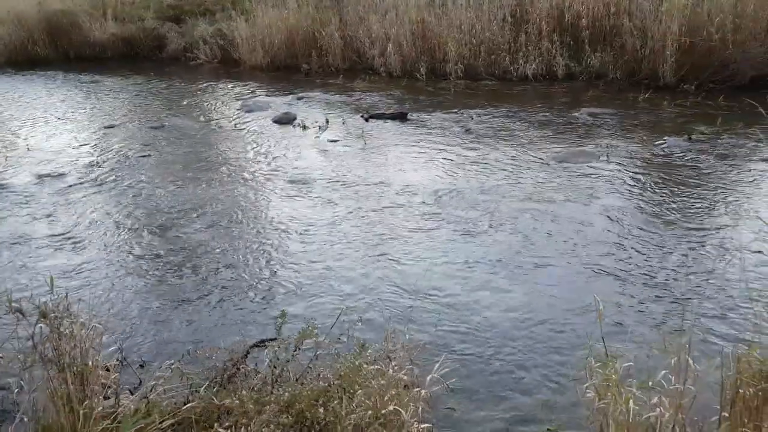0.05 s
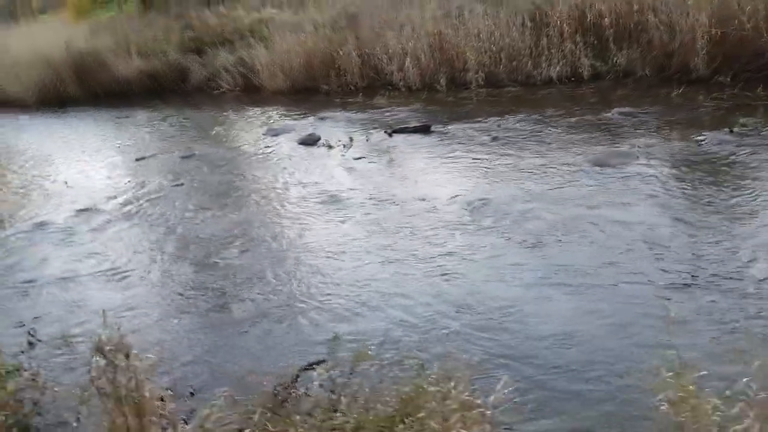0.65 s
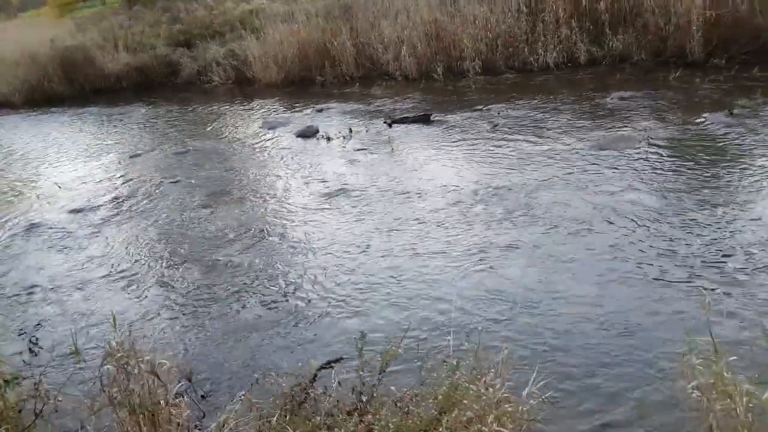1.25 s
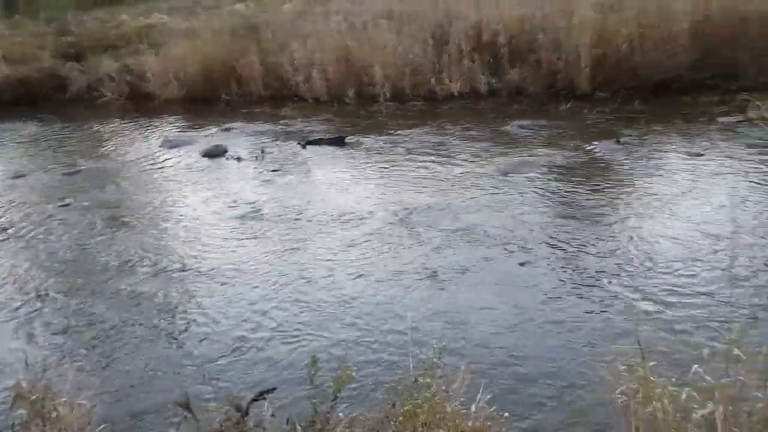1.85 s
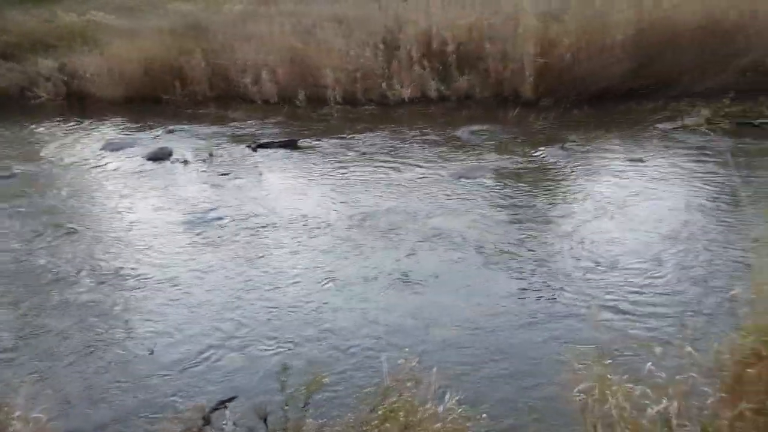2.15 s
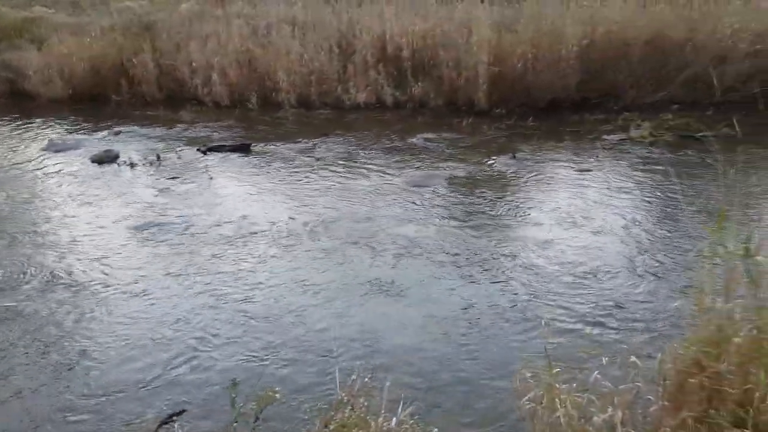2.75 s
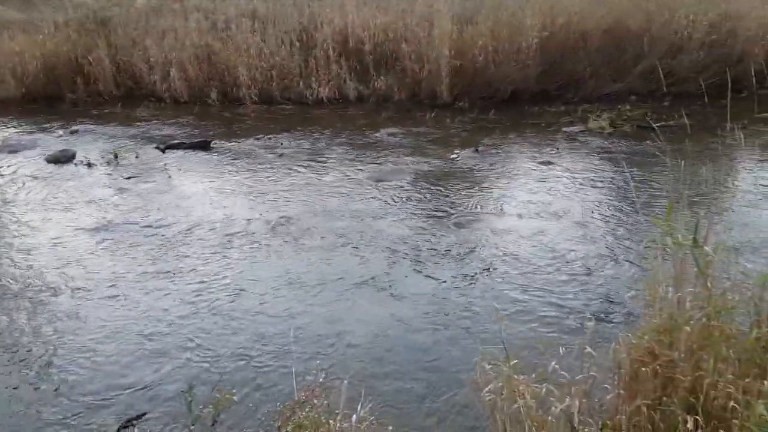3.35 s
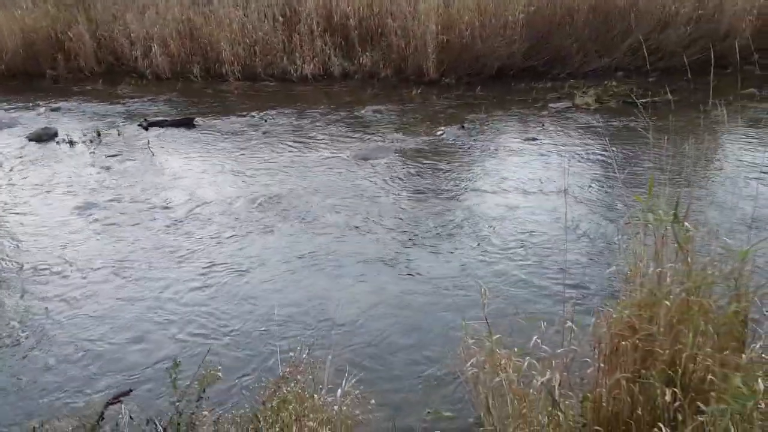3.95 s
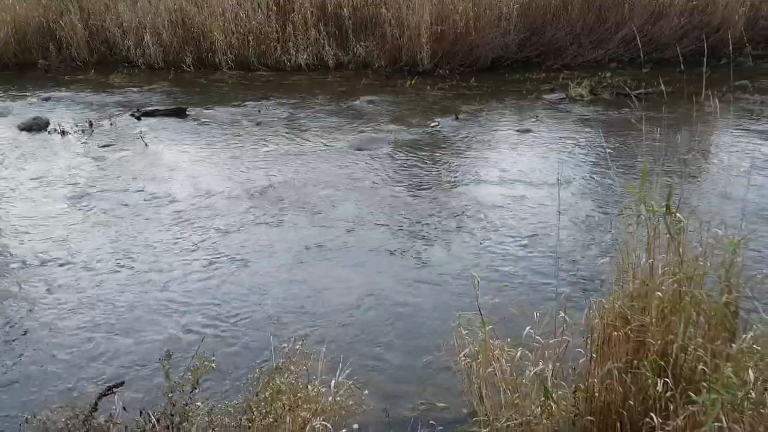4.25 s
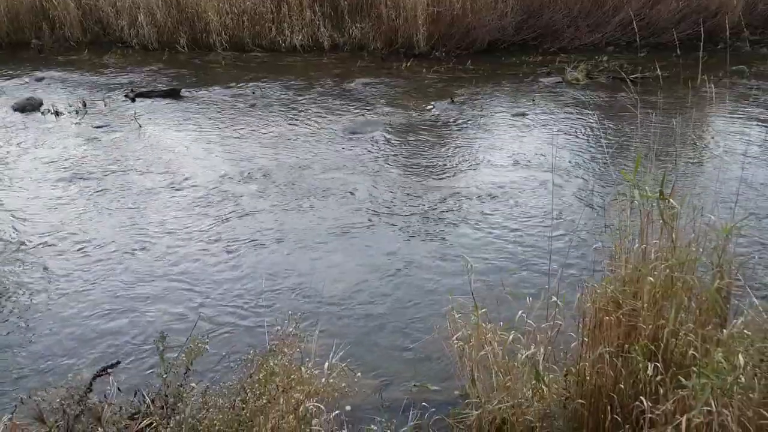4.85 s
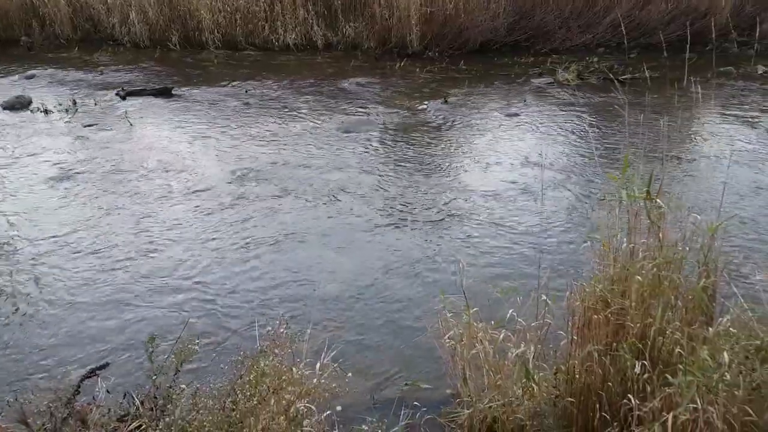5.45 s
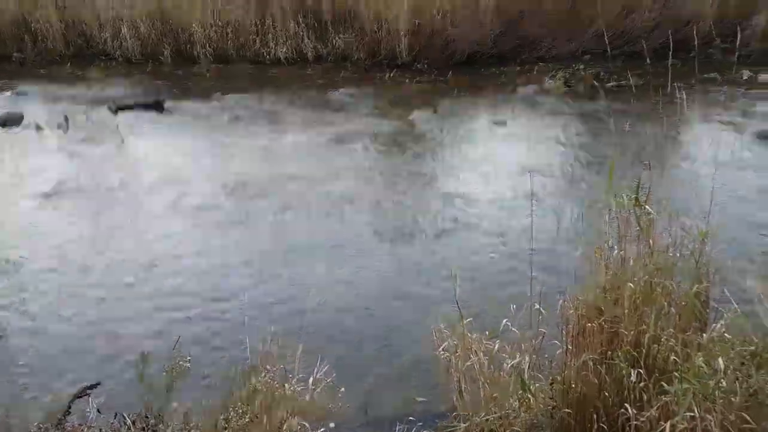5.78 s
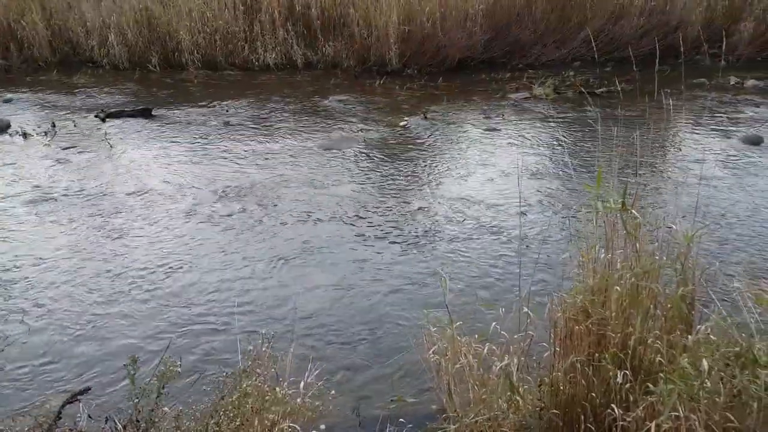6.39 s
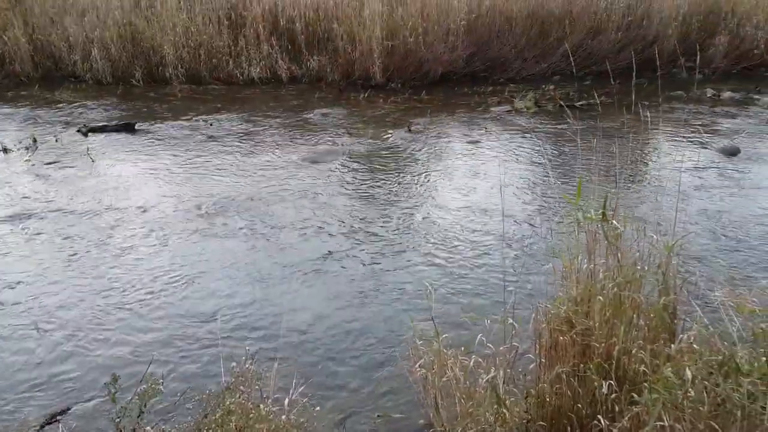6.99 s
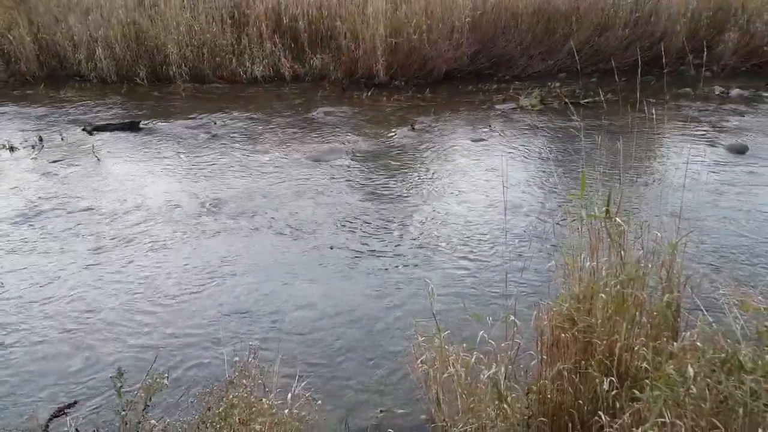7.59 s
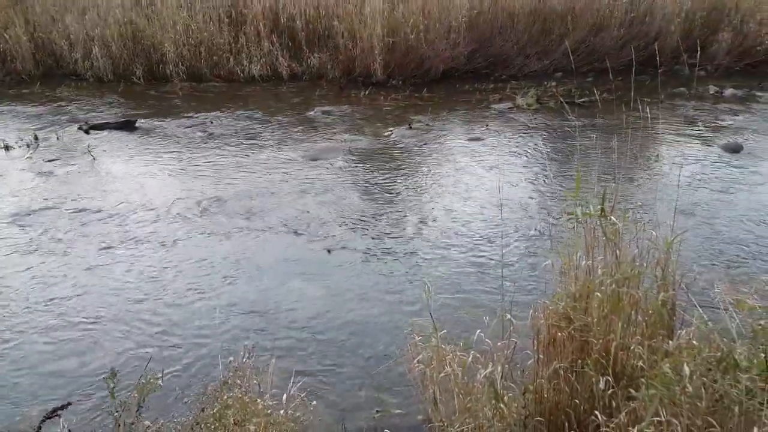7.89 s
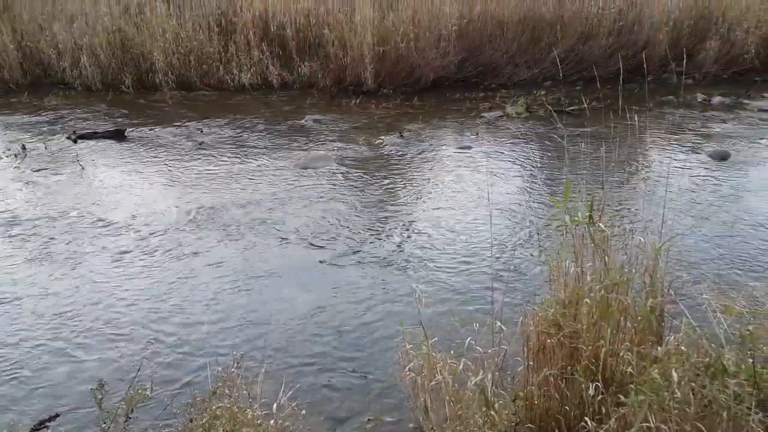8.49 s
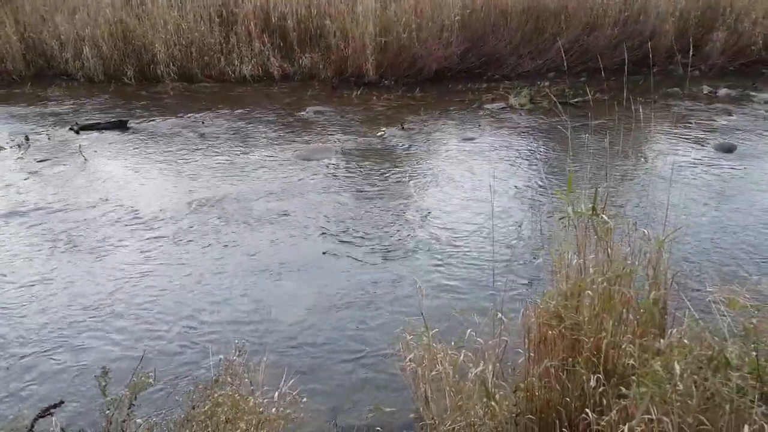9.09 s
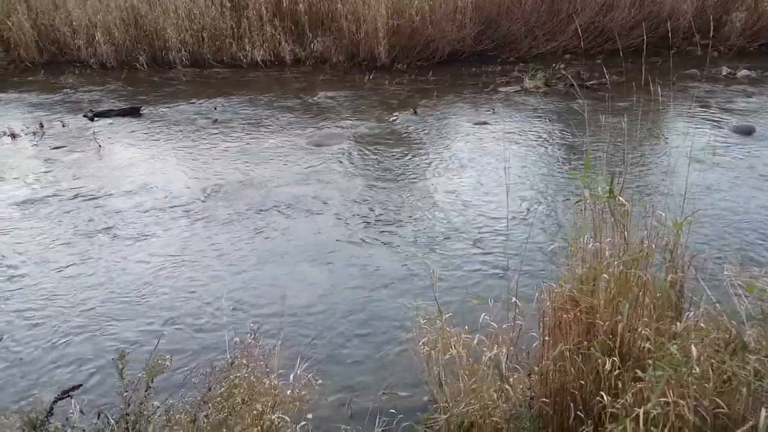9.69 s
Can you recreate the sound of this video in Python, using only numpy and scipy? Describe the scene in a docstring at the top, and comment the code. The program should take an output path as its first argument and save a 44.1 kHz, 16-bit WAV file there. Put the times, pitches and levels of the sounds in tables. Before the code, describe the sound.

A shallow creek ripples softly over a faint distant engine drone, with low handling knocks and brief wind thuds on the microphone.

```python
"""Shallow creek from the bank

A creek ripples past reeds: a wash of far ripples, ringing bubbles, breaking wavelets and fine spray.
It is heard through a hand-held camera whose half-covered left port muffles the water. Fingers knock,
rub and creak on the case, and a few puffs of wind thud on the left port. Over faint air and hiss lies
a distant engine drone: one revving tone, with a set of low harmonics that swells once."""
import sys
import numpy as np
from scipy import signal
from scipy.fft import rfft, irfft, next_fast_len
from scipy.io import wavfile
from scipy.ndimage import uniform_filter1d

SR = 44100
rng = np.random.default_rng(int(sys.argv[2]) if len(sys.argv) > 2 else 0)


def dump_mix(stems):
    """Bounce the given channels to the path in sys.argv[1] as a 16-bit WAV at rate SR."""
    frames = np.atleast_2d(stems).T  # one column per channel
    limited = np.clip(frames, -1, 1)  # hard clip at full scale
    pcm = np.round(limited * 32767).astype(np.int16)
    wavfile.write(sys.argv[1], SR, pcm)


N = 429093
TIME = np.arange(N) / SR


def from_db(db):
    """Decibels to gain."""
    return 10 ** (np.asarray(db) / 20)


def rms_one(x):
    """Scale to unit power."""
    return x / np.sqrt(np.mean(x ** 2) + 1e-20)


def in_time(rows):
    """Each column of a curve at every sample."""
    times, *columns = np.transpose(rows)
    return [np.interp(TIME, times, column) for column in columns]


def cut(x, hz, kind, order=2):
    """Butterworth filter."""
    sos = signal.butter(order, np.clip(hz, 10, .45 * SR), kind, fs=SR, output="sos")
    return signal.sosfilt(sos, x)


def drift(rate_hz, hop=40):
    """Smooth random wander with a spread of 1."""
    pole = np.exp(-2 * np.pi * hop * rate_hz / SR)
    white = rng.standard_normal(N // hop + 2002)
    slow = signal.lfilter([1], [1, -2 * pole, pole * pole], white)[2000:]
    return np.interp(np.arange(N) / hop, np.arange(len(slow)), rms_one(slow))


def coloured(x, spectrum):
    """EQ a sound with a curve drawn on a log-frequency axis."""
    size = next_fast_len(N)
    hz = np.maximum(np.fft.rfftfreq(size, 1 / SR), 1)
    curve_hz, curve_db = np.transpose(spectrum)
    gain = from_db(np.interp(np.log(hz), np.log(curve_hz), curve_db))
    return irfft(rfft(x, size) * gain, size)[:N]


def swells(rows, rise_db_per_s, fall_db_per_s, rest_db=-120):
    """Level in dB of events that rise, hold and fall back to a resting level."""
    levels = [db - rise_db_per_s * np.maximum(s - TIME, 0)
              - fall_db_per_s * np.maximum(TIME - s - hold_s, 0) for s, hold_s, db in rows]
    return np.maximum(np.max(levels, axis=0), rest_db)


def air(hiss_db=-73, stir_db=-58):
    """Microphone hiss and the low stir of open air, separate at each port."""
    # microphone self-noise: f/Hz, relative level/dB
    hiss_colour = [(1000, 12), (5000, 4), (8000, -0.5), (11000, 1), (13000, 6), (15500, -4.5)]
    hiss = np.array([rms_one(coloured(white, hiss_colour)) for white in rng.standard_normal((2, N))])
    stir = rms_one(cut(rng.standard_normal((2, N)), [18, 125], "band"))
    return from_db(hiss_db) * hiss + from_db(stir_db) * stir


def engine_speed(idle_hz=52.2, rise_s=0.196, settle_s=0.98):
    """Firing rate in Hz: each rev climbs quickly and sinks slowly towards idle."""
    # tops of the revs: t/s, firing rate/Hz
    revs = [(0, 56.73), (1.42, 72.5)]
    above_idle = [(hz - idle_hz) * np.clip(1 + (TIME - s) / rise_s, 0, 1)
                  * np.exp(-np.maximum(TIME - s, 0) / settle_s) for s, hz in revs]
    return idle_hz + np.max(above_idle, axis=0)


def engine_drone(base_top_hz=24.75, swell_db_per_octave=30, waver=0.025, flutter_db=1.7, left_db=-5):
    """Only the low end carries from afar: a revving tone, harmonics that swell once, a dull roar."""
    # the revving tone carries clearly, then fades to a trace: t/s, hold/s, level/dB
    clear_spell = [(0, 2.7, -49.8)]
    # the low harmonics swell once, rising in pitch as they get louder: t/s, hold/s, level/dB
    harmonic_swell = [(1.0, 1.2, -54)]
    # their balance: order, relative level/dB
    harmonics = [(3, -5.5), (4, -0.5), (5, -1), (6, -17)]
    tone_db = swells(clear_spell, rise_db_per_s=18, fall_db_per_s=11, rest_db=-58)
    swell_db = swells(harmonic_swell, rise_db_per_s=18, fall_db_per_s=11)
    base_hz = base_top_hz * 2 ** ((swell_db - swell_db.max()) / swell_db_per_octave)
    firing_phase = 2 * np.pi * np.cumsum(engine_speed() * (1 + waver * drift(15.0))) / SR
    base_phase = 2 * np.pi * np.cumsum(base_hz * (1 + waver * drift(10.1))) / SR
    drone = from_db(tone_db + flutter_db * drift(2.6)) * np.sin(firing_phase)
    for order, level_db in harmonics:
        drone += from_db(swell_db + level_db + 0.95 * drift(4)) * np.sin(round(order) * base_phase)
    roar = rms_one(cut(rng.standard_normal((2, N)), [45, 135], "band", order=3))
    return (np.sqrt(2) * drone + from_db(tone_db - 6) * roar) * from_db([[left_db], [0]])


def wind(steepening=0.37, right_db=-44):
    """Large eddies thud on the left port; small ones grow faster with the strength of the puff."""
    # puffs, timed where they reach their top: t/s, hold/s, strength/dB
    puffs = [(5.665, .05, -19.5), (5.765, 0.048, -32.5), (5.845, .035, -12.5), (6.102, 0.028, -5.5)]
    # eddy bands, large to small, at a strength of 0 dB: f/Hz, level/dB
    eddies = [(48, -2), (115, -1), (270, -4), (640, -11), (1500, -21.5), (3400, -55)]
    strength_db = swells(puffs, rise_db_per_s=950, fall_db_per_s=718)
    pressure = 0
    for hz, level_db in eddies:
        growth = 1 + steepening * max(np.log2(hz / 100), 0)  # dB gained per dB of strength
        eddy = cut(rng.standard_normal(N), [hz / 1.65, hz * 1.65], "band", order=3)
        eddy /= np.sqrt(uniform_filter1d(eddy ** 2, SR // 50) + 1e-12)  # the puff alone sets the level
        pressure += eddy * from_db(level_db + growth * strength_db)
    return pressure * from_db([[0], [right_db]])


def grip(lumpy_db=4.0, right_db=-17):
    """Skin shifting on the case rumbles unevenly, mostly on the covered side."""
    # finger rubs: t/s, hold/s, level/dB
    rubs = [(5.15, .4, -45.5), (6.6, 0.85, -46), (7.8, 0.58, -38), (8.45, 0.21, -36.5)]
    # colour of the hand's rumble: f/Hz, relative level/dB
    rumble_colour = [(25, -3), (50, 2), (90, 1.5), (130, -1), (200, -15), (400, -29.5), (900, -35.5)]
    level_db = swells(rubs, rise_db_per_s=53, fall_db_per_s=56, rest_db=-53)
    rumble = np.array([coloured(white, rumble_colour) for white in rng.standard_normal((2, N))])
    rumble = cut(cut(rumble, 900, "low"), 50, "high", order=1)
    rumble = rms_one(rumble * from_db(lumpy_db * drift(16)))
    return from_db(level_db) * rumble * from_db([[0], [right_db]])


def slips(per_s=18, peak_db=-35, spread_db=4.5, ring_hz=62, sharp_hz=870):
    """Skin sticks and slips at uneven intervals; each slip is a small, sharp knock."""
    # the case creaks under a tightening grip: start/s, end/s
    creaks = [(5.2, 5.56), (6.36, 6.97)]
    rows = []
    for start, end in creaks:
        for k, (late, size, edge) in enumerate(rng.standard_normal((30, 3))):
            s = start + (k + late / 4) / per_s
            if s < end:
                rows.append((s, peak_db + spread_db * size, ring_hz, sharp_hz * 2 ** (edge / 2)))
    return rows


def knocks(ring_t60_s=0.051, port_hz=45, right_db=-21):
    """A finger's push is a pressure step that sets the case ringing low; sharp contacts click."""
    # finger knocks on the left side: t/s, peak/dB, ring/Hz, contact sharpness/Hz
    contacts = [(0.771, -31.5, 101, 120), (1.272, -26, 91, 165), (3.296, -21.5, 77.4, 194),
                (3.559, -31, 71, 220), (4.074, -30.5, 100, 120), (4.53, -26.5, 117, 220),
                (5.458, -25, 60, 159), (5.648, -12.5, 79.6, 850), (6.053, -27, 150, 714),
                (6.584, -28.5, 59, 850), (7.009, -21.5, 81.6, 306), (7.022, -23, 60, 850),
                (8.083, -20.5, 121, 220), (8.1, -15.5, 65, 277), (8.171, -19, 113, 169),
                (8.199, -20, 110, 166), (8.994, -28, 101, 120), (9.237, -34, 99, 850),
                (9.588, -31.5, 60, 120)]
    out, age = np.zeros(N + SR), np.arange(SR // 8) / SR
    for s, peak_db, ring_hz, sharp_hz in list(contacts) + slips():
        ring = np.cos(2 * np.pi * ring_hz * age) * np.exp(-np.log(1000) * age / ring_t60_s)
        thump = cut(cut(ring, sharp_hz, "low"), port_hz, "high")
        out[round(s * SR):][:len(age)] += from_db(peak_db) * thump / np.abs(thump).max()
    return out[:N] * from_db([[0], [right_db]])


def ticks(low_hz=250, left_db=-12):
    """The plastic shell gives tiny, dry snaps."""
    # snaps on the open side: t/s, peak/dB, brightness/Hz
    snaps = [(3.2966, -23.5, 3100), (5.4576, -29, 600), (7.848, -28, 1470), (8.8783, -28, 1560)]
    out = np.zeros(N)
    for s, peak_db, bright_hz in snaps:
        snap = cut(signal.unit_impulse(SR // 100), bright_hz, "low")
        snap = cut(snap, low_hz, "high", order=1)
        out[round(s * SR):][:len(snap)] += from_db(peak_db) * snap / snap.max()
    return out * from_db([[left_db], [0]])


def near_gurgles(cycles=75, rise=.5):
    """Single bubbles ring close by, creeping up in pitch as they die away."""
    # near bubbles: t/s, peak/dB, f/Hz
    gurgles = [(.394, -49, 4220), (1.619, -43, 3200), (2.435, -41, 666), (2.536, -45, 4480),
               (2.914, -43, 4440), (4.57, -42, 427), (4.597, -48, 3130), (8.054, -38, 847),
               (8.593, -35.5, 840), (9.042, -38, 936)]
    out, age = np.zeros(N + SR), np.arange(SR // 10) / SR
    for s, peak_db, hz in gurgles:
        tone = np.sin(2 * np.pi * hz * age * (1 + rise * age / 2))
        decay = np.exp(-np.log(1000) * age * hz / cycles)
        out[round(s * SR):][:len(age)] += from_db(peak_db) * tone * decay
    return out[:N]


def faint_wavelets(per_s=1.1, low_hz=800, high_hz=8000, level_db=-50.5, db_per_octave=-4.5):
    """Faint wavelets break at random times; the small, bright ones are the weakest."""
    when, size = rng.random((40, 2))[:int(per_s * N / SR)].T
    hz = low_hz * (high_hz / low_hz) ** size
    return list(zip(when * N / SR, level_db + db_per_octave * np.log2(hz / low_hz), hz))


def splashes(rise_s=.006, width=1.3):
    """Each wavelet that breaks close by is a short burst of fizz."""
    # the clearest wavelets: t/s, level/dB, centre/Hz
    clear_wavelets = [(0.674, -53, 3270), (1.66, -55, 5030), (2.083, -45, 1100), (4.155, -57.5, 7500),
                      (4.329, -59, 8800), (4.674, -56, 5760)]
    out, age = np.zeros(N + SR), np.arange(SR // 10) / SR
    swell = age / rise_s * np.exp(1 - age / rise_s)
    fizz = rng.standard_normal((50, len(age)))
    for (s, level_db, hz), white in zip(list(clear_wavelets) + faint_wavelets(), fizz):
        burst = rms_one(cut(white, [hz / width, hz * width], "band"))
        out[round(s * SR):][:len(age)] += from_db(level_db) * burst * swell
    return out[:N]


def churn(spectrum, patchy_db, shared_db, rate_hz):
    """Half-octave bands of noise that each swell on their own and a little together; rms 1."""
    edges = np.geomspace(60, 17000, 18)
    out, white = 0, rng.standard_normal((2, N))
    for k, band in enumerate(zip(edges, edges[1:])):
        out += cut(white[k % 2], band, "band") * from_db(patchy_db * drift(rate_hz))
    return rms_one(coloured(out, spectrum) * from_db(shared_db * drift(rate_hz / 2)))


def bubbles(per_s, low_hz, high_hz, cycles, spread_db, rise):
    """Each bubble rings for some cycles and rises in pitch as it nears the surface; rms 1."""
    out = np.zeros(N + SR)
    for when, size, strength in rng.random((3000, 3))[:int(per_s * N / SR)]:
        hz = low_hz * (high_hz / low_hz) ** size
        life = np.linspace(0, 1, int(cycles * SR / hz))
        ring = np.sin(2 * np.pi * cycles * life * (1 + rise * life / 2)) * np.exp(-np.log(1000) * life)
        out[int(when * N):][:len(life)] += ring * from_db(spread_db * min(-np.log(strength), 4))
    return rms_one(out[:N])


def wash():
    """Countless far ripples merge into a wash with low gurgles in it."""
    # colour of the wash: f/Hz, relative level/dB
    wash_colour = [(100, -8.5), (300, -2), (550, -3), (800, 0.5), (1100, -3), (1550, -4), (2000, -12.5),
                   (3000, -34), (6000, -52)]
    bed = churn(wash_colour, patchy_db=1.96, shared_db=0.5, rate_hz=17)
    gurgles = bubbles(per_s=130, low_hz=330, high_hz=1800, cycles=34, spread_db=3.6, rise=.08)
    return from_db(7) * bed + from_db(-2) * gurgles


def ripples():
    """Nearer ripples are brighter and quicker, dotted with droplets."""
    # colour of the ripples: f/Hz, relative level/dB
    ripple_colour = [(1000, -22.5), (2100, 2.5), (2700, -2), (3300, -2), (4500, -17.5), (7000, -39)]
    bed = churn(ripple_colour, patchy_db=2.0, shared_db=0.96, rate_hz=43)
    droplets = bubbles(per_s=90, low_hz=1900, high_hz=5500, cycles=30, spread_db=3.4, rise=.08)
    return from_db(4) * bed + from_db(-9) * droplets


def spray():
    """Fine spray hisses and tiny bubbles fizz; the top treble slowly dips and lifts."""
    # colour of the spray: f/Hz, relative level/dB
    spray_colour = [(2500, -5), (4300, 4), (5600, -2), (7500, -8.5), (9500, -5.5), (12000, -7),
                    (15500, -10.5)]
    # shelf that picks out the top treble: f/Hz, gain/dB
    top_band = [(9000, -27), (10300, 0)]
    # level ride on that shelf: t/s, gain/dB
    top_ride = [(0, -0.5), (2.6, -5.5), (4.2, 0.5), (6.4, 0), (9.73, 4)]
    hiss = churn(spray_colour, patchy_db=1.1, shared_db=1.4, rate_hz=97)
    fizz = bubbles(per_s=220, low_hz=4500, high_hz=14500, cycles=14, spread_db=3.6, rise=.1)
    top_db, = in_time(top_ride)
    hiss += (from_db(top_db) - 1) * coloured(hiss, top_band)
    return from_db(8.5) * hiss + from_db(-1.5) * fizz


def water():
    """Running water: wash, ripples and spray in a slowly shifting balance."""
    # faders of the flow: t/s, wash gain/dB, ripple gain/dB, spray gain/dB
    flow = [(0.0, -56.5, -64, -68), (1.08, -55.5, -63, -67.5), (5.36, -55.5, -62, -68.5),
            (5.94, -55, -60.5, -71.5), (6.42, -58.5, -66, -74.5), (7.26, -56, -60.5, -72),
            (9.73, -54.5, -60, -70.5)]
    wash_db, ripple_db, spray_db = in_time(flow)
    return from_db(wash_db) * wash() + from_db(ripple_db) * ripples() + from_db(spray_db) * spray()


def creek(shared_db=-8, lag_s=0.000528):
    """The creek is wide, so the ports hear mostly different ripples; the left hears them muffled."""
    # muffling at the half-covered port: f/Hz, gain/dB
    covered = [(100, -21.5), (200, -16), (380, -16), (700, -19), (1300, -22), (2400, -18), (4400, -20),
               (8000, -39), (15000, -1)]
    right = water() + near_gurgles() + splashes()
    left = water() + from_db(shared_db) * np.interp(TIME - lag_s, TIME, right)
    return np.array([coloured(left, covered), right])


def scene():
    """Water and a distant engine drone ahead, hand and wind on the case."""
    return creek() + engine_drone() + knocks() + ticks() + grip() + wind() + air()


def record(dry):
    """Peaks are rounded off at full scale; a steep low-pass cuts the very top."""
    return signal.sosfilt(signal.ellip(10, .1, 70, 15850, fs=SR, output="sos"), np.tanh(dry))


dry = scene()
out = record(dry)
dump_mix(out)
```